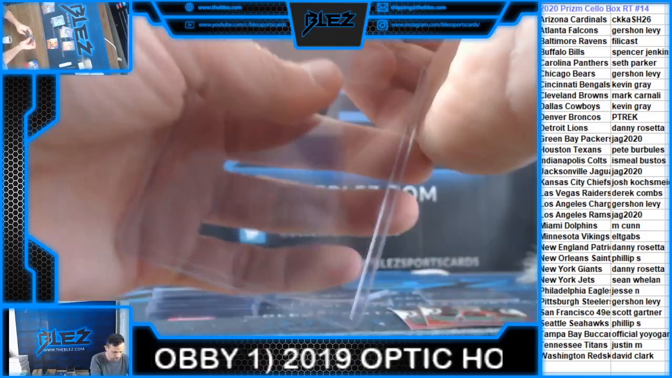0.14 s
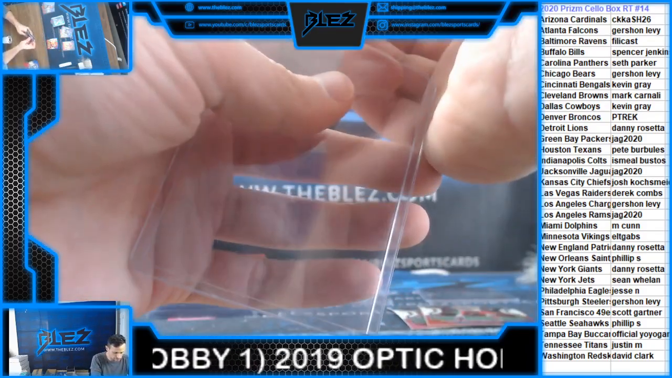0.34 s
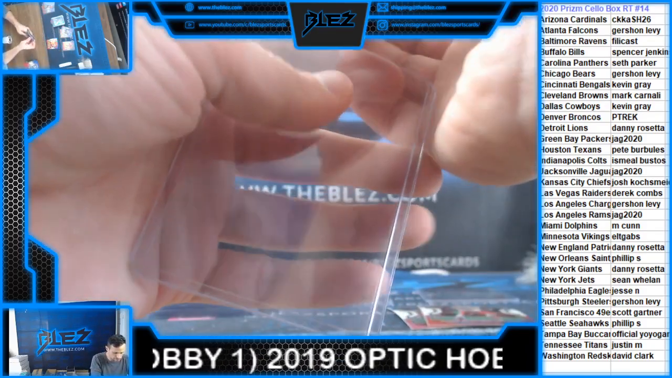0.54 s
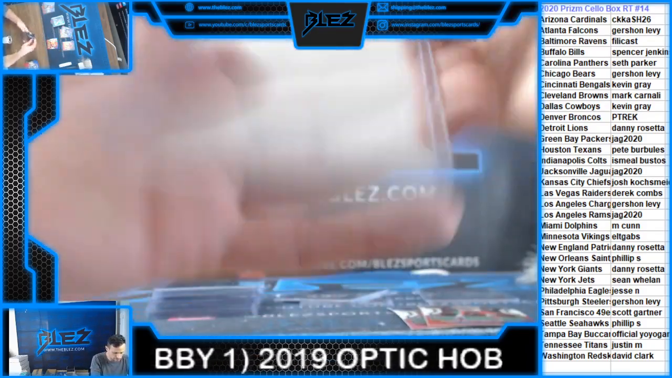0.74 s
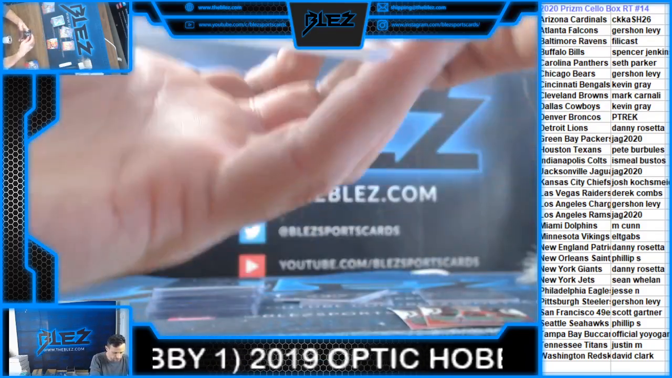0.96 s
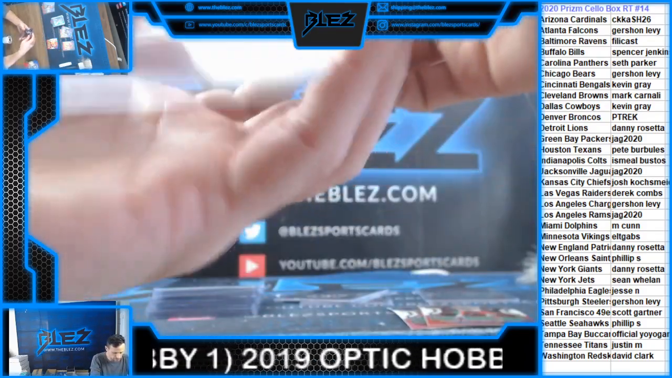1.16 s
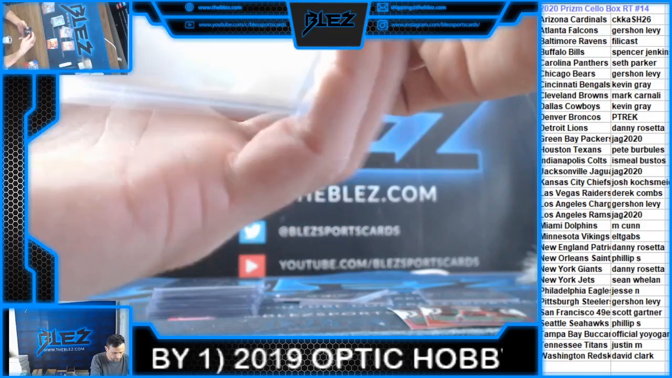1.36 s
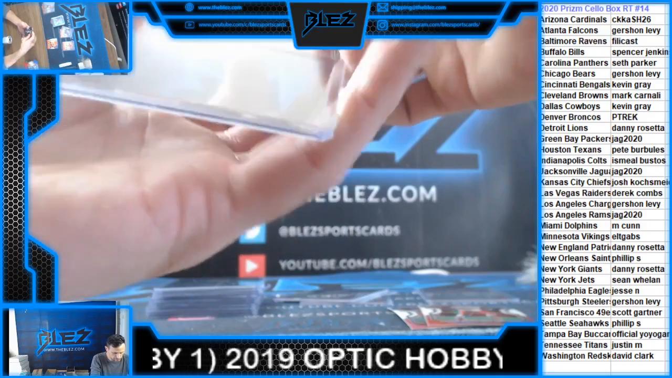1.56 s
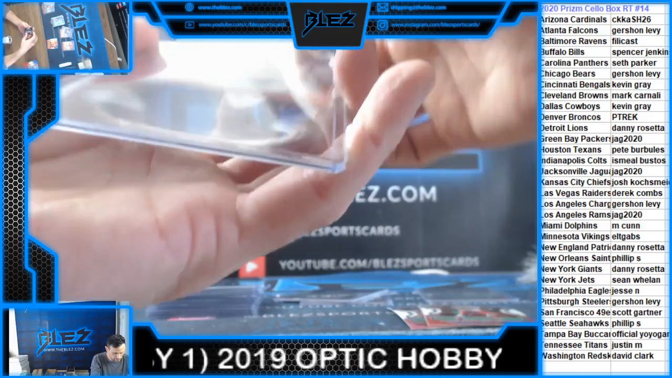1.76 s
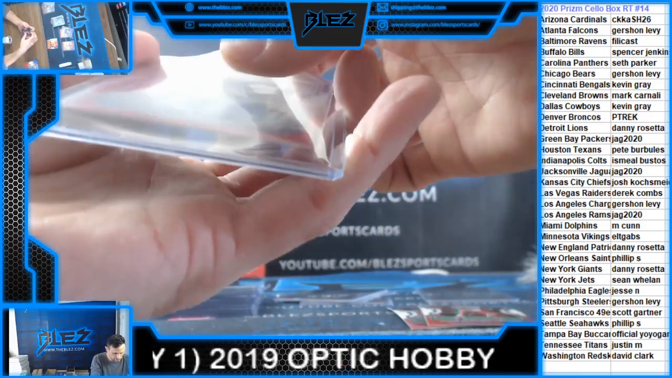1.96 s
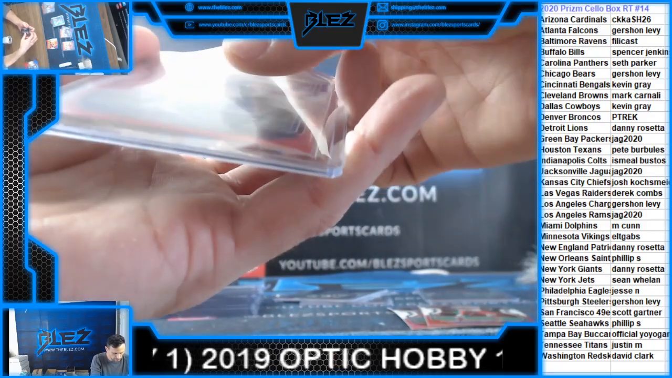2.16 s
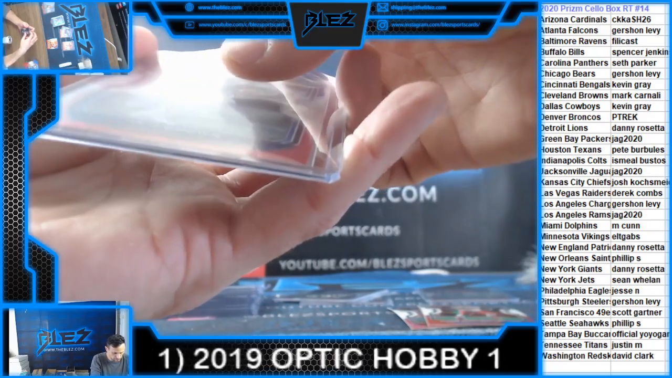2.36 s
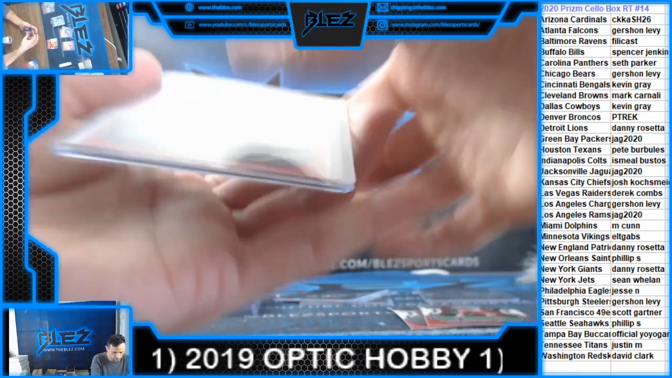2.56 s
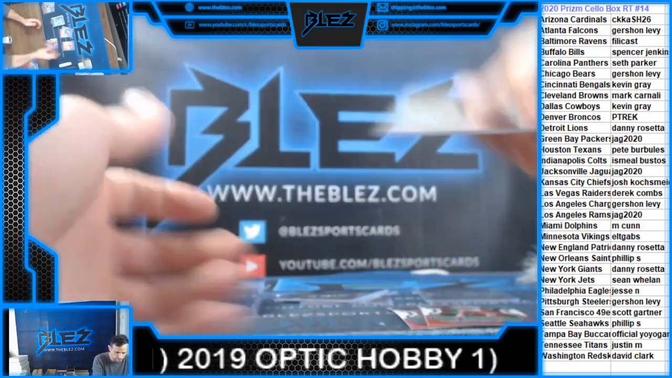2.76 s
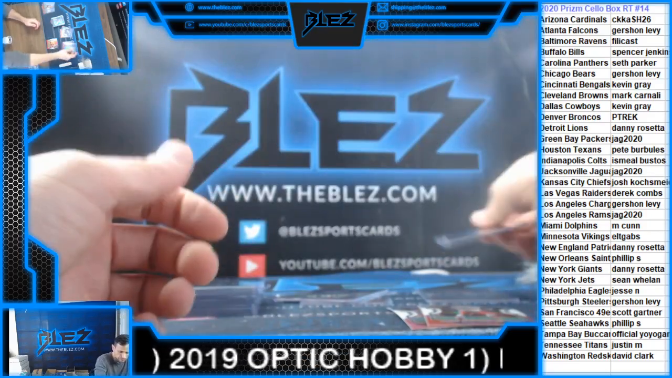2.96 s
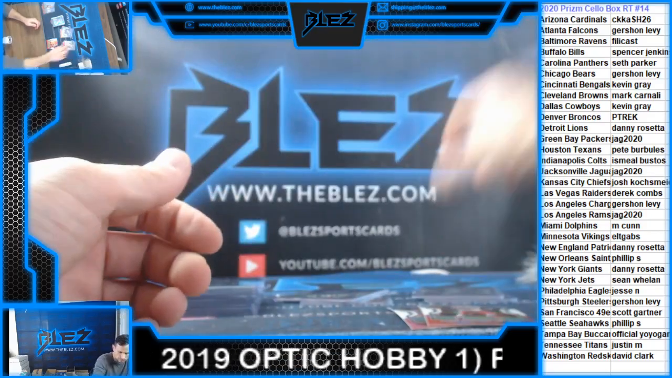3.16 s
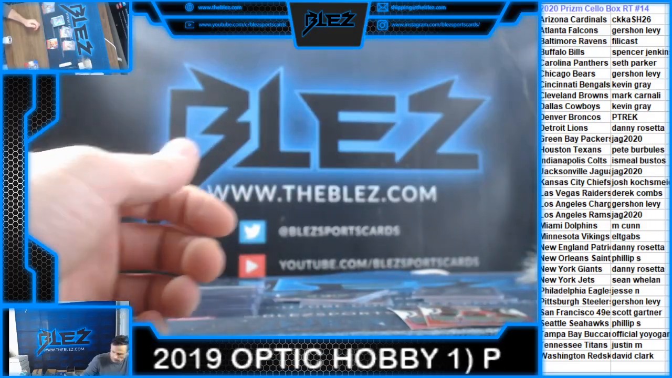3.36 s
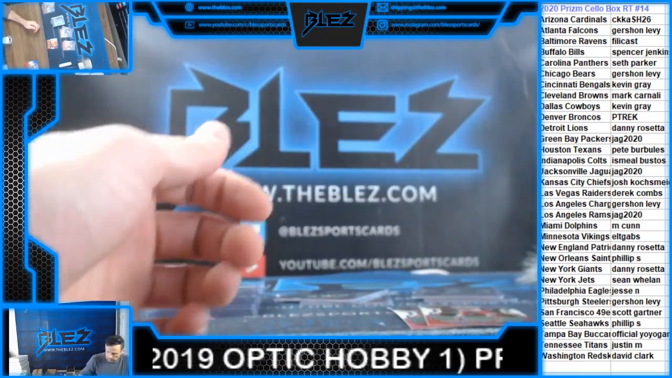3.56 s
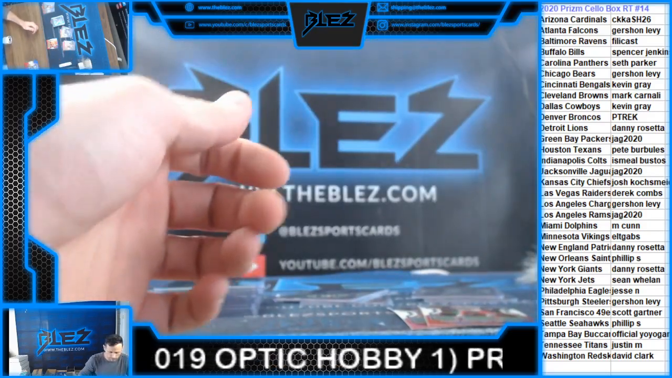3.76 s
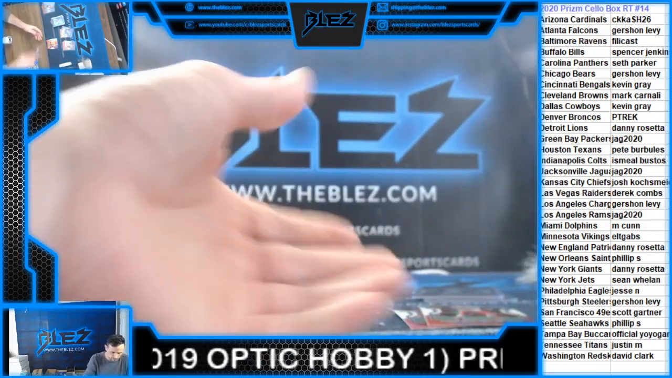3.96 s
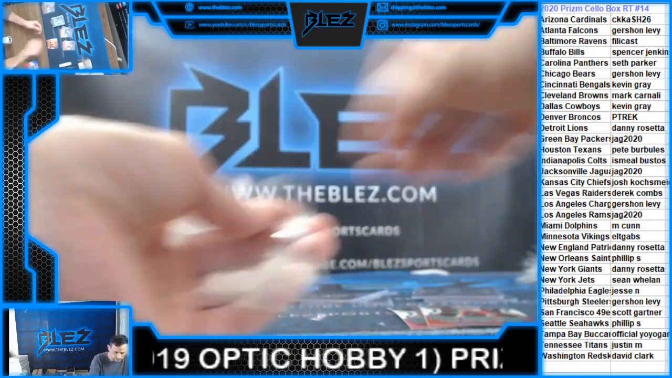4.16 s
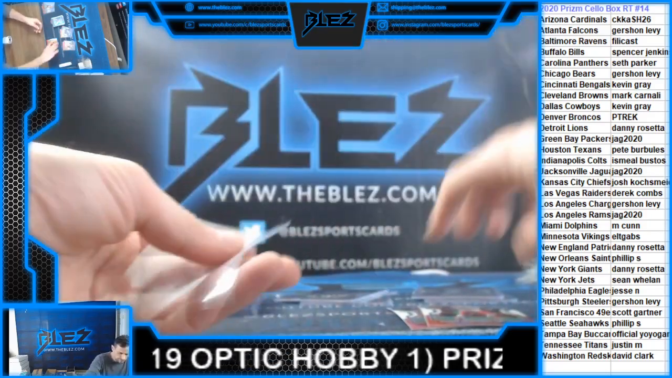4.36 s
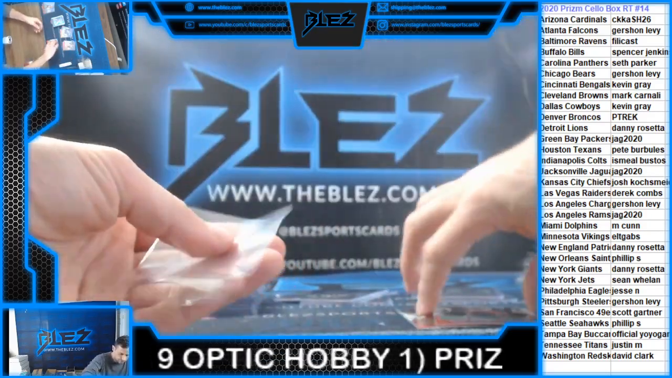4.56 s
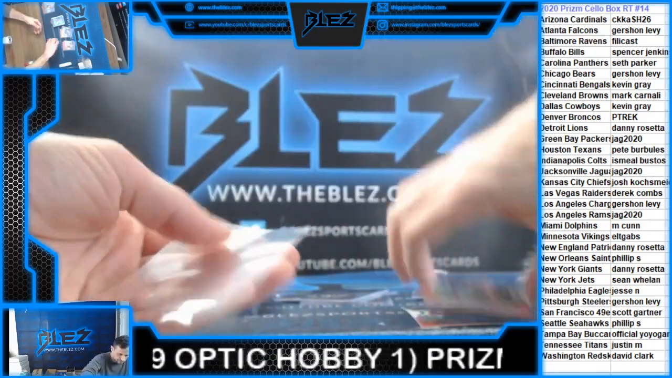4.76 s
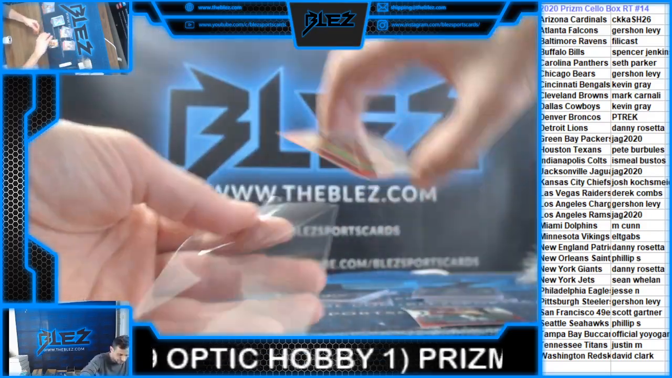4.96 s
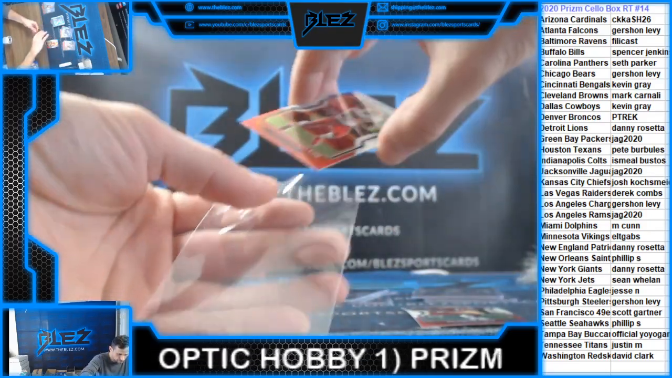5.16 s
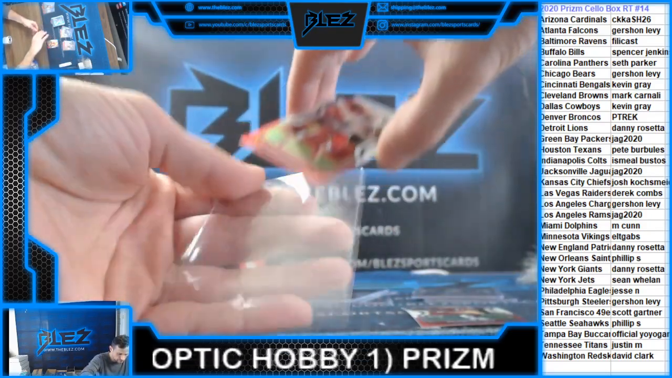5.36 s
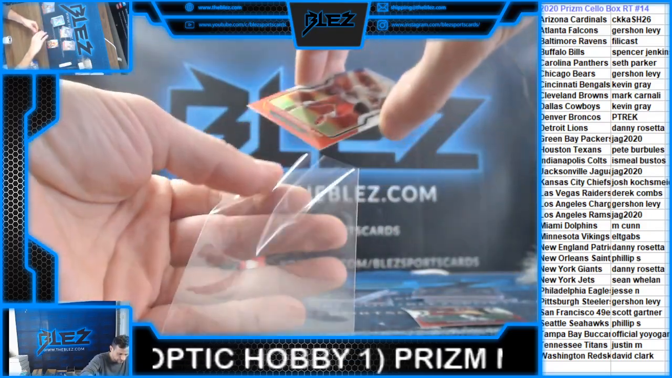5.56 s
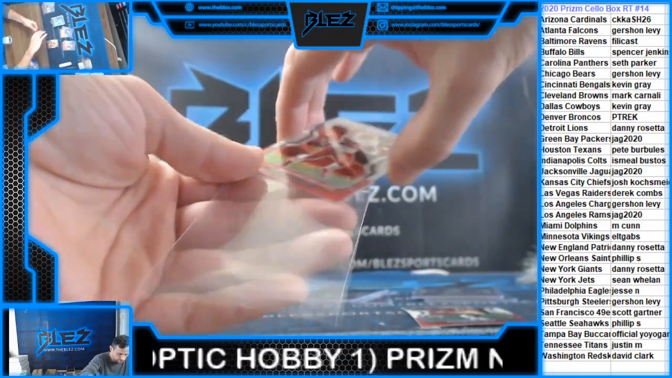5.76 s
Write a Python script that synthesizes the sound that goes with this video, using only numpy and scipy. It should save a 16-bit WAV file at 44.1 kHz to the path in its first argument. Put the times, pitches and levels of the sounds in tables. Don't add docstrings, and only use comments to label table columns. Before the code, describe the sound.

Close stereo microphone in a small room with low fan rumble and faint hiss. Plastic film snaps crisply, a rigid card holder slides and scrapes softly, then is slapped onto the table in a fast, bright clatter near three seconds. Afterwards come soft rustles, short scrapes and small clicks as a card goes into a thin sleeve.

```python
import sys
import numpy as np
from scipy import signal
from scipy.fft import rfft, irfft, next_fast_len
from scipy.io import wavfile
from scipy.ndimage import map_coordinates

SR = 44100
rng = np.random.default_rng(int(sys.argv[2]) if len(sys.argv) > 2 else 0)


def pcm_store(signal):
    levels = np.round(np.clip(np.atleast_2d(signal), -1, 1) * 32767)
    wavfile.write(sys.argv[1], SR, levels.astype(np.int16).T)


def gain_from_db(level_db):
    decades = np.asarray(level_db, float) / 20
    return 10 ** decades


N = 256220
T = np.arange(N) / SR


def unit(x):
    return x / np.sqrt(np.mean(x ** 2) + 1e-20)


def along(points, hz):
    f, v = np.transpose(points)
    return np.interp(np.log(hz + 1), np.log(f + 1), v)


def filtered(x, response):
    n = x.shape[-1]
    m = next_fast_len(n + 4096)
    return irfft(rfft(x, m) * response(np.fft.rfftfreq(m, 1 / SR)), m)[..., :n]


def modes(table):
    def response(f):
        total = 0
        for k, (hz, width, db) in enumerate(table):
            damping = 1j * f * width
            total = total + (-1) ** k * gain_from_db(db) * damping / (hz * hz - f * f + damping)
        return total
    return response


def wobble(rate):
    return map_coordinates(rng.standard_normal(int(N * rate / SR) + 4), [T * rate])


def pair(gain, alike):
    def mid_side(hz):
        turn = np.arccos(np.clip(along(alike, hz), -1, 1)) / 2
        return gain(hz) * np.array([np.cos(turn), np.sin(turn)])
    mid, side = filtered(rng.standard_normal((2, N)), mid_side)
    return unit(np.array([mid + side, mid - side]))


def sides(pan_db):
    return gain_from_db([[pan_db / 2], [-pan_db / 2]])


def swell(s, hold_s, rise_s, fall_s, loss_db):
    before = np.clip(s - T, 0, None) / max(rise_s, .005)
    after = np.clip(T - s - hold_s, 0, None) / max(fall_s, .005)
    return gain_from_db(-loss_db * (before + after))


# band_hz, density_db (per Hz)
AIR_SPECTRUM = [(24, -31), (40, -8.5), (75, -11.5), (96, -14), (200, -12.5), (366, -19), (437, -22),
                (483, -28), (637, -28), (741, -32), (1080, -36), (1580, -38), (7130, -48.5), (14800, -48),
                (16400, -58)]
# band_hz, coherence (0 to 1)
AIR_COHERENCE = [(60, 0.97), (300, 0.47), (1400, 0.75), (3100, 0.11), (6800, 0.62), (9000, 0.92),
                 (15000, 0.33)]
# mode_hz, width_hz, level_db
ROOM_MODES = [(68.7, 3.7, 0), (125.5, 11, -3.5), (152, 2.9, -2.5), (208.4, 3.4, -12)]
# pitch_hz, rms_db
MOTOR_TONES = [(733, -75)]


def air():
    hiss_gain = gain_from_db(-56.5 + 0.38 * wobble(0.8))
    hiss = hiss_gain * pair(lambda hz: gain_from_db(along(AIR_SPECTRUM, hz)), AIR_COHERENCE)
    rumble = gain_from_db(-57) * pair(modes(ROOM_MODES), [(100, 0.79)])
    whine = 0
    for hz, db in MOTOR_TONES:
        level = gain_from_db(db + 3 + .8 * wobble(6.7))
        phase = 2 * np.pi * np.cumsum(hz + 1.4 * wobble(4.4)) / SR
        whine = whine + level * np.sin(phase)
    return hiss + rumble + whine


# start_s, lean_s, sway_db, drone_db
NUDGES = [(.08, .01, -50.5, -55), (.4, 0.14, -59, -53.5), (.8, .02, -53, -56), (1.3, 0.2, -56, -57.5),
          (1.58, 0.021, -53, -47), (1.78, 0.17, -51, -54), (2.12, 0.015, -62, -45.5),
          (2.24, 0.022, -57, -60), (2.66, 0.033, -48, -40), (2.839, .06, -43, -48),
          (3.02, 0.16, -41.5, -32.5), (3.368, .02, -52, -61), (3.55, 0.113, -50.5, -46.5),
          (4.1, 0.029, -35.5, -44.5), (4.22, 0.23, -36.5, -50.5), (4.62, 0.22, -48.5, -52),
          (5.28, 0.017, -59.5, -68), (5.43, 0.024, -64, -52), (5.7, 0.022, -67, -66)]


def table():
    rise_s, sway_t60_s, drone_t60_s = 0.22, .7, 0.33
    rocking, droning = gain_from_db(-57.5), gain_from_db(-64.5)
    for s, lean_s, sway_db, drone_db in NUDGES:
        rocking = rocking + gain_from_db(sway_db) * swell(s, lean_s, rise_s, sway_t60_s, 60)
        droning = droning + gain_from_db(drone_db) * swell(s, lean_s, rise_s, drone_t60_s, 60)
    capsule_phase = np.array([[0], [1.9]])
    rock = np.sin(2 * np.pi * np.cumsum(27.5 + 1.5 * wobble(6)) / SR + capsule_phase)
    loose = pair(modes([(27, 1.6, 0)]), [(30, 0.092)])
    shake = unit(rock + .3 * loose)
    drone = pair(lambda hz: modes([(65, 14, 0)])(hz) ** 2, [(60, 0.16)])
    return rocking * shake * sides(-2.4) + droning * gain_from_db(-4.5) * drone


# fastest_s, speed_up_s, slow_down_s, film_hiss_db, slot_db
STROKES = [(.716, .2, 0.23, -67, -76), (1.1, 0.29, .3, -81, -93.5), (1.62, 0.017, .1, -71, -63.5),
           (1.75, 0.083, 0.19, -62.5, -61), (2.57, .06, 0.25, -67.5, -75.5), (3.499, .08, 0.25, -75, -76),
           (4.189, 0.14, 0.28, -70, -72.5), (4.55, 0.076, 0.044, -75.5, -89),
           (4.914, 0.06, 0.061, -61.5, -75.5), (5.1, 0.082, 0.66, -81.5, -84),
           (5.45, .1, 0.027, -76, -93.5), (5.8, 0.09, 0.088, -66, -70)]
# band_hz, density_db (per Hz)
FILM = [(1500, -33.5), (2500, -7), (4300, -1.5), (5800, -4.5), (7800, 1.5), (10500, -7), (14000, -6),
        (16400, -14)]
# mode_hz, width_hz, level_db
SLOT = [(1700, 200, 0), (2500, 350, -6), (3200, 350, -8)]


def slides():
    speed = np.array([swell(s, 0, up_s, down_s, 10) for s, up_s, down_s, _, _ in STROKES])
    hiss, hollow = gain_from_db(np.transpose(STROKES)[3:]) @ speed
    grain = unit(gain_from_db(3 * wobble(300) + 2 * wobble(40)))
    film = pair(lambda hz: gain_from_db(along(FILM, hz)), [(3000, 0.23), (12000, 0.94)])
    slot = unit(gain_from_db(2.5 * wobble(70))) * pair(modes(SLOT), [(2000, .75)])
    return sides(3) * (hiss * grain * film + hollow * slot)


# mode_hz, width_hz, level_db
SNAP_RINGS = [(7900, 1200, -8), (11500, 3000, -13), (14300, 2500, -9)]


def snaps(table, body, spread, apart, pan_db, crinkle_ms):
    out, t = np.zeros((3, N + SR)), np.arange(SR // 20) / SR
    pan = np.array([[pan_db / 2], [-pan_db / 2], [0]])
    release = t == 0
    for s, db, hz, body_db in table:
        noise = rng.standard_normal((3, len(t)))
        crinkle = (noise[0] + apart * noise[1:]) * np.exp(-1000 * t / crinkle_ms)
        burst = 1.4 * crinkle + 0.54 * release
        burst = np.vstack([burst, release * np.linalg.norm(burst[0])])
        bright = modes([(hz, spread * hz, 0)])
        film = filtered(burst, lambda f: bright(f) ** 2 + modes(SNAP_RINGS)(f))
        whole = burst[:2].mean(0)
        stiff = filtered(np.array([whole, whole, burst[2]]), modes(body))
        film = film / np.abs(film[:2]).max()
        stiff = stiff / np.abs(stiff[:2]).max()
        out[:, round(s * SR):][:, :len(t)] += gain_from_db(db + pan) * (film + gain_from_db(body_db) * stiff)
    return out[:2, :N], out[2, :N]


# start_s, peak_db, bright_hz, card_body_db
BUCKLES = [(.558, -47, 4780, -18), (.5815, -25, 5400, -26), (0.5824, -30.5, 7100, -37),
           (.5885, -28.5, 6500, -25), (1.916, -44, 6200, -18), (2.508, -54.5, 7700, -18),
           (3.68, -56, 7470, -12), (4.23, -27, 5970, -33), (4.2312, -36.5, 3080, -2),
           (4.418, -58.5, 2710, 2), (4.454, -53.5, 2690, -16), (4.47, -55, 2018, 1),
           (4.51, -59.5, 1980, 0.5), (4.987, -41, 10300, -0.5), (5.0046, -27.5, 7970, -6.5),
           (5.0075, -28, 5410, -6.5), (5.257, -53.5, 10940, -14.5)]
# mode_hz, width_hz, level_db
CARD = [(1590, 1400, 0), (1800, 730, 3.5), (2810, 1100, -2.5)]


def buckles():
    return snaps(BUCKLES, CARD, spread=1.0, apart=0.61, pan_db=7.5, crinkle_ms=2.1)


# start_s, length_s, film_db, hollow_db, hollow_hz
SCRAPES = [(0.683, 0.017, -60.5, -65.5, 1730), (1.112, 0.014, -60, -63, 2740),
           (1.556, 0.0038, -66, -53, 1800), (1.733, .045, -61, -60.5, 1750), (2.37, 0.023, -62, -61, 2370),
           (2.551, 0.048, -60, -59, 2500), (3.568, 0.058, -64, -67, 2260), (4.009, 0.055, -56, -60, 2120),
           (4.155, 0.015, -56.5, -56, 2570), (4.848, 0.0136, -53.5, -57.5, 2600),
           (5.35, 0.012, -60.5, -70, 2400), (5.374, .012, -80, -61.5, 3840), (1.96, 0.02, -64, -71.5, 2000),
           (0.762, 0.11, -75, -106, 3500), (5.626, 0.054, -68.5, -75, 1950)]


def scrapes():
    out = np.zeros((2, N))
    film = pair(lambda hz: gain_from_db(along(FILM, hz)), [(3000, .7), (12000, .5)]) * unit(gain_from_db(4 * wobble(250)))
    rub = pair(np.ones_like, [(2000, .75)]) * unit(gain_from_db(4 * wobble(150)))
    for s, length, film_db, hollow_db, hz in SCRAPES:
        span = slice(round(s * SR), round((s + length + 0.038) * SR))
        t = T[span] - s
        stroke = np.clip(t / 0.0034, 0, 1) * np.exp(-np.clip(t - length, 0, 1) / 0.007)
        cavity = modes([(hz, .3 * hz, 0), (.45 * hz, .25 * hz, -5)])
        hollow = unit(filtered(rub[:, span], cavity))
        out[:, span] += stroke * (gain_from_db(film_db) * film[:, span] + gain_from_db(hollow_db) * hollow)
    return out * sides(1.5)


# start_s, peak_db, bright_hz, card_body_db
SLEEVE_SNAPS = [(0.6884, -49, 9150, -3), (1.1127, -52, 3600, -10), (1.5564, -62, 3910, -7),
                (1.5994, -44.5, 5510, -25), (1.6087, -43.5, 7500, 1.5), (1.6697, -44.5, 7310, -4),
                (1.703, -51, 6940, 5), (1.9696, -57, 7200, 9), (2.4486, -61, 7870, -4),
                (2.6328, -33, 4700, -6.5), (2.9387, -58, 7600, 1), (3.492, -55.5, 7910, 2.5),
                (3.5622, -45, 6760, -19), (3.5766, -38, 6840, -43), (3.689, -41.5, 7310, -47),
                (4.0148, -31.5, 5915, -11), (4.026, -37.5, 3730, -1.5), (4.155, -58, 7300, 13),
                (4.3069, -37.5, 7270, -33), (4.8584, -34, 7200, -8), (5.1927, -52, 4980, -4),
                (5.3479, -43, 8570, -11), (5.3697, -36, 7320, -7.5), (5.6815, -59, 4790, 1),
                (5.7838, -50.5, 8640, -23)]


def sleeve_snaps():
    return snaps(SLEEVE_SNAPS, CARD, spread=0.88, apart=0.09, pan_db=8.5, crinkle_ms=0.75)


# start_s, level_db, pitch_hz, t60_s, boom_db
KNOCKS = [(1.562, -54, 1800, 0.036, -75), (1.618, -44, 1680, 0.029, -76), (2.622, -29, 350, 0.02, -59),
          (2.622, -44.5, 597, 0.029, -70.5), (2.632, -36.5, 154, 0.11, -56.5),
          (2.974, -25.5, 633, 0.017, -48.5), (2.987, -20, 518.6, 0.03, -60.5),
          (2.9865, -7.5, 1729, 0.021, -70.5), (2.988, -12.5, 1440, .022, -69.5),
          (4.232, -52.5, 1173, 0.073, -78.5), (2.989, -8, 655, 0.013, -41), (2.991, -27, 170.9, 0.12, -50),
          (2.992, -13.5, 371, 0.04, -44.5), (3.503, -74, 338.6, 0.034, -43),
          (5.0038, -37.5, 580, 0.019, -66), (5.0054, -34.5, 476, 0.024, -68),
          (5.008, -43, 385, 0.014, -59.5)]


def knocks():
    out, t = np.zeros((2, N + SR)), np.arange(SR // 2) / SR
    for s, db, hz, t60, boom_db in KNOCKS:
        phase = min(.6, 330 / hz) * np.array([[1], [-1]])
        panel_gain = gain_from_db(db - 60 * t / t60) * (1 - np.exp(-t / 0.0002))
        panel = panel_gain * np.sin(2 * np.pi * hz * t + phase)
        boom_gain = gain_from_db(boom_db - 60 * t / 0.43) * (1 - np.exp(-t / 0.13))
        boom = boom_gain * np.sin(2 * np.pi * 64 * t)
        out[:, round(s * SR):][:, :len(t)] += panel + boom
    return out[:, :N] * sides(0.67)


# start_s, peak_db, bright_hz, holder_body_db
SLAP = [
    (2.9718, -9.5, 7500, -7.5),
    (2.9743, -9, 3700, -12),
    (2.982, -24.5, 5000, -4.5),
    (2.9858, -8, 8330, -4),
    (2.9882, -8, 8030, -3),
    (2.9915, -16, 4000, 0.5),
    (2.9953, -10, 6800, -8.5),
    (2.9983, -9.5, 4200, -9),
    (3.0023, -11.5, 5595, -5),
]
# mode_hz, width_hz, level_db
HOLDER = [(900, 680, -6), (1377, 580, -3), (1750, 310, -7), (2500, 350, -5), (3700, 720, -8)]


def slap():
    return snaps(SLAP, HOLDER, spread=0.38, apart=0.51, pan_db=4.0, crinkle_ms=1.1)


def tail(decays, rise_s):
    hz, t, z = signal.stft(rng.standard_normal((2, SR // 2)), SR, nperseg=128)
    decay = gain_from_db(-60 * t / along(decays, hz)[:, None])
    x = signal.istft(z * decay, SR, nperseg=128)[1][:, :SR // 2]
    x = (x + 0.16 * x[::-1]) * (1 - np.exp(-T[:SR // 2] / rise_s))
    return x / np.linalg.norm(x[0])


# delay_ms, level_db
REFLECTIONS = [(6.5, -16.5), (16, -23.5)]
# band_hz, t60_s
WALL_DECAY = [(500, 0.035), (10000, 0.02)]
# band_hz, t60_s
ROOM_DECAY = [(100, 0.26), (500, 0.3), (2000, 0.3), (4500, 0.34), (6000, .3), (8500, 0.22), (12000, 0.19)]
# band_hz, t60_s
FAR_DECAY = [(300, 0.35), (1200, 0.85), (4000, .7), (7000, 0.41)]


def room(near, blows, wall_db, wet_db, far_db):
    early = 0
    for k, (ms, db) in enumerate(REFLECTIONS):
        bounced = near[::(-1) ** k]
        early = early + gain_from_db(db) * np.roll(bounced, round(ms * SR / 1000), axis=1)
    late, step = np.zeros((2, N + SR)), 2 * SR // 5
    for a in range(0, N, step):
        echo = np.roll(tail(WALL_DECAY, .0008), round(.0092 * SR), axis=1)
        answer = gain_from_db(wall_db) * echo + gain_from_db(wet_db) * tail(ROOM_DECAY, 0.002)
        answer = answer + gain_from_db(far_db) * tail(FAR_DECAY, 0.061)
        wet = signal.fftconvolve(blows[None, a:a + step], answer, axes=1)
        late[:, a:a + wet.shape[1]] += wet
    return early + late[:, :N]


def hands_lag(hz):
    return np.exp(1j * np.pi * hz * 22e-6 * np.array([[1], [-1]]))


def scene():
    buckle, buckle_blows = buckles()
    sheet, sheet_blows = sleeve_snaps()
    slapped, slap_blows = slap()
    thuds, rubs = knocks(), scrapes()
    near = filtered(sheet + buckle + slapped + thuds + rubs, hands_lag)
    blows = sheet_blows + buckle_blows + gain_from_db(-2.0) * slap_blows
    blows = blows + (gain_from_db(-4.5) * thuds + rubs).mean(0)
    answer = room(near, blows, wall_db=-6.5, wet_db=-2.0, far_db=-17.5)
    return near + answer + slides() + table() + air()


def top_cut(x):
    return signal.sosfilt(signal.butter(12, 16500, fs=SR, output="sos"), x)


def record(dry):
    mix = filtered(dry, lambda hz: hz < 16500)
    return top_cut(mix)


dry = scene()
out = record(dry)
pcm_store(out)
```